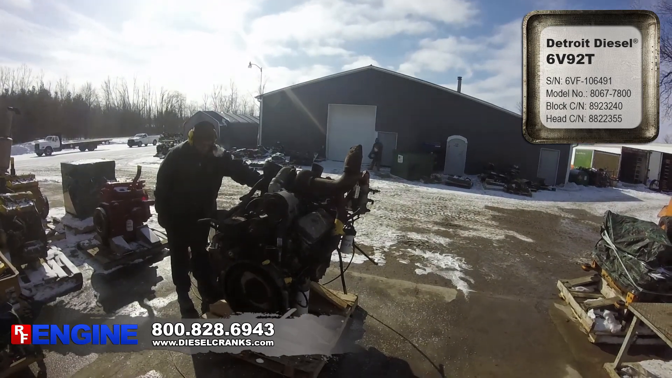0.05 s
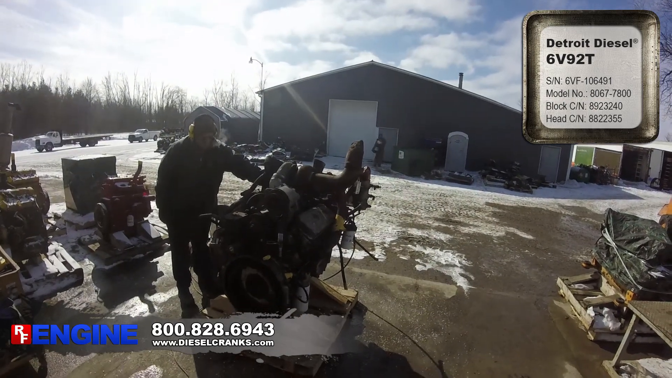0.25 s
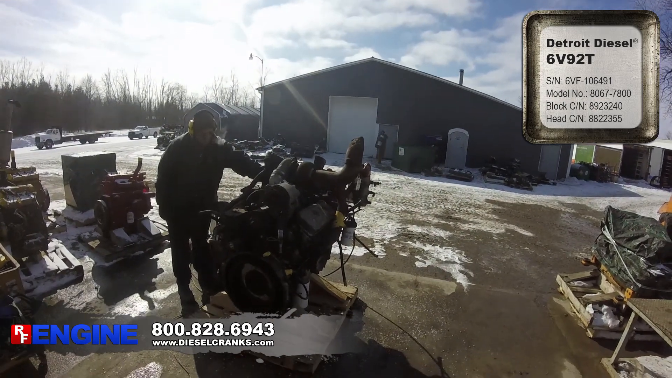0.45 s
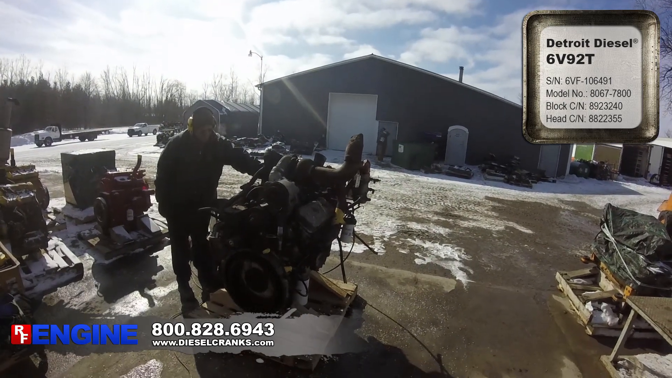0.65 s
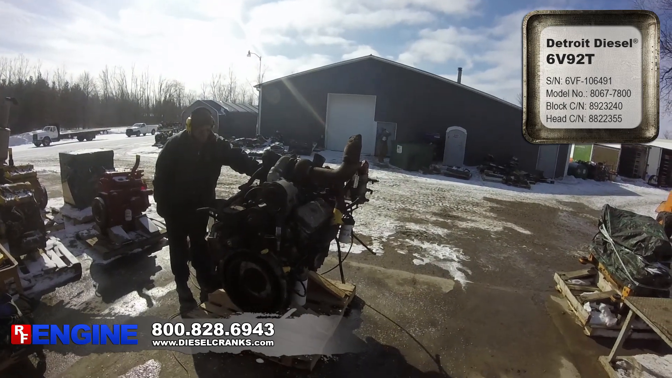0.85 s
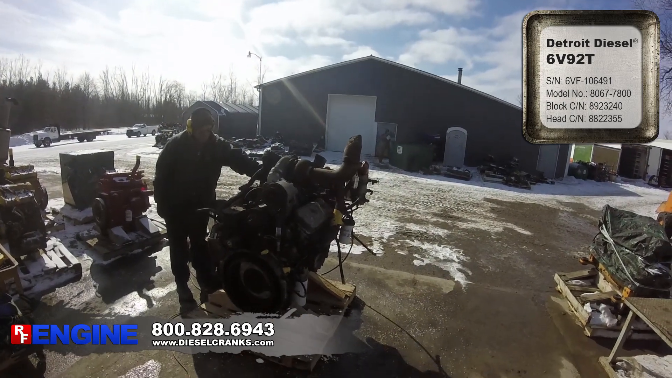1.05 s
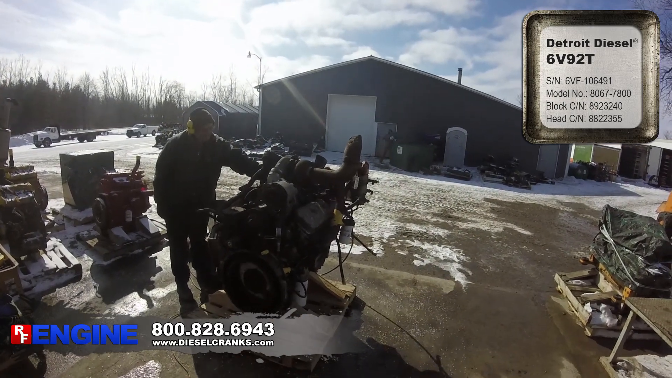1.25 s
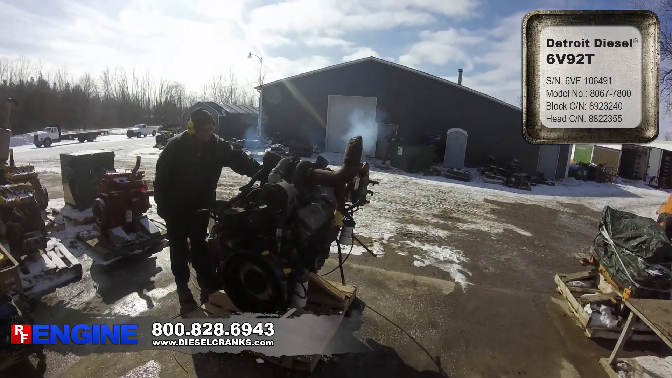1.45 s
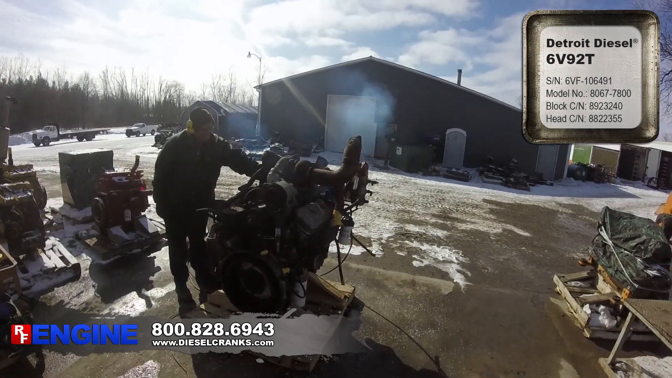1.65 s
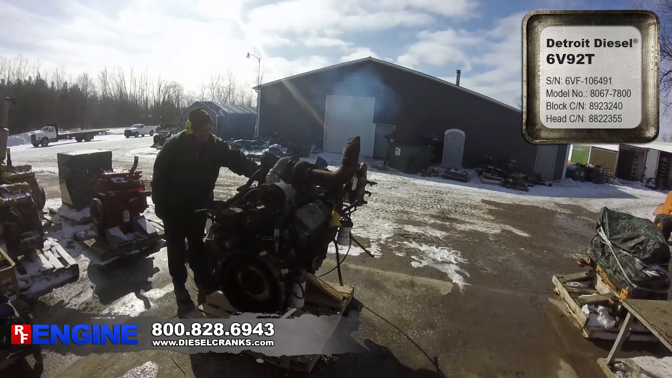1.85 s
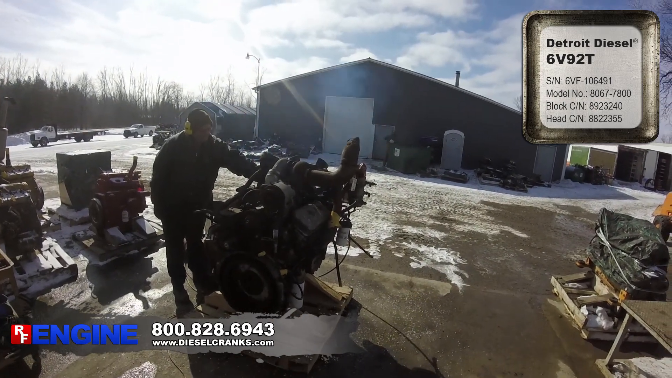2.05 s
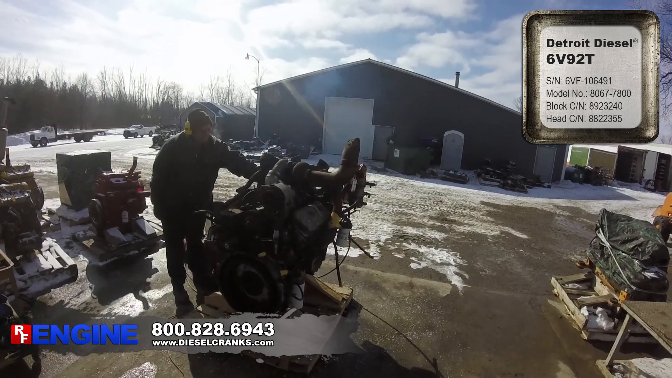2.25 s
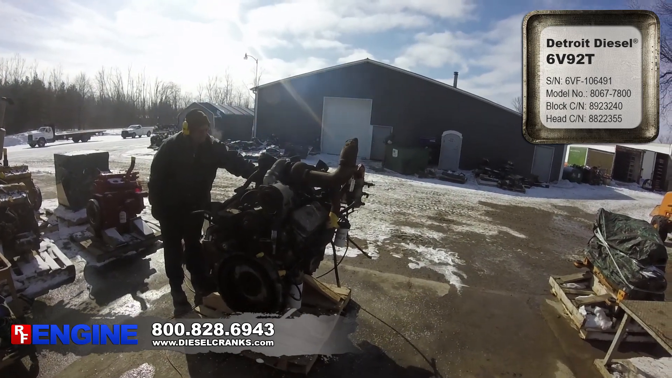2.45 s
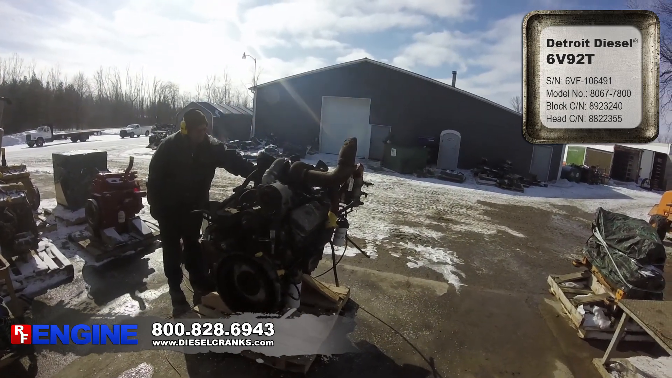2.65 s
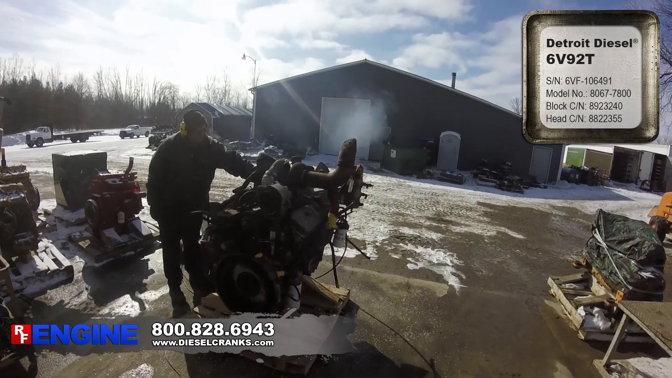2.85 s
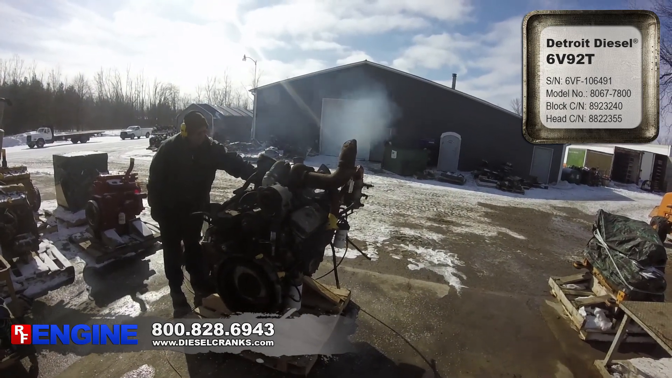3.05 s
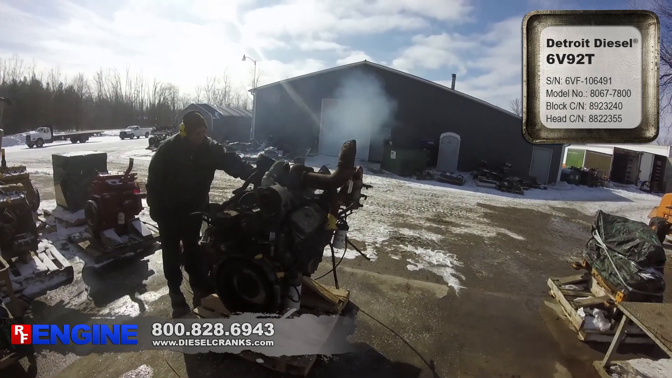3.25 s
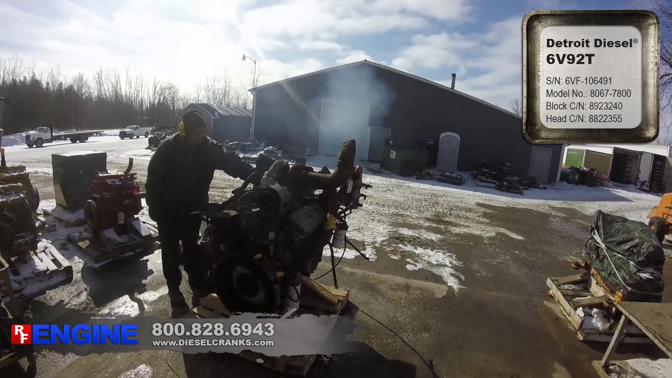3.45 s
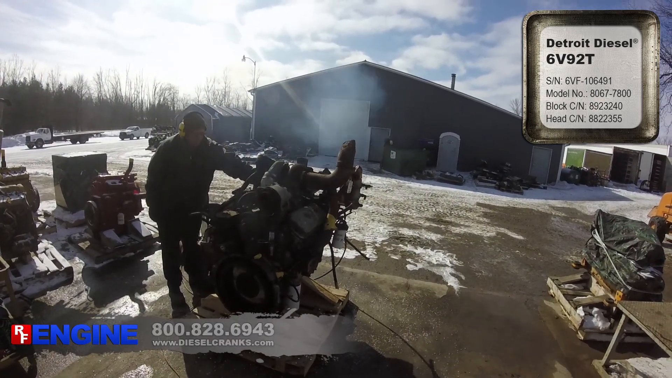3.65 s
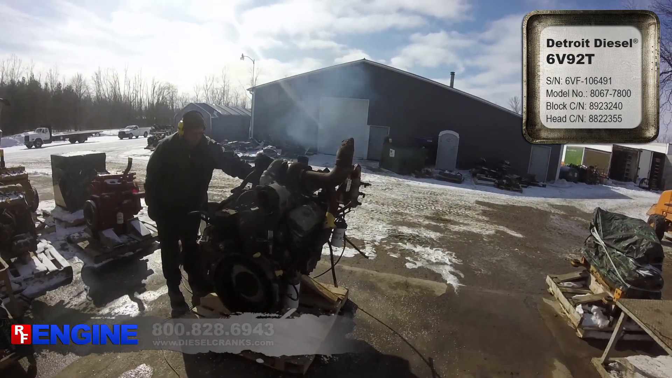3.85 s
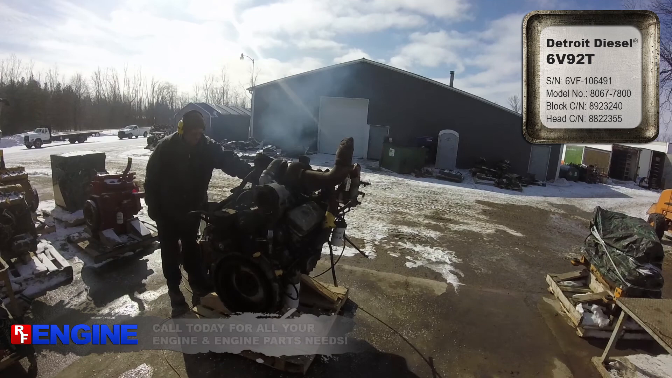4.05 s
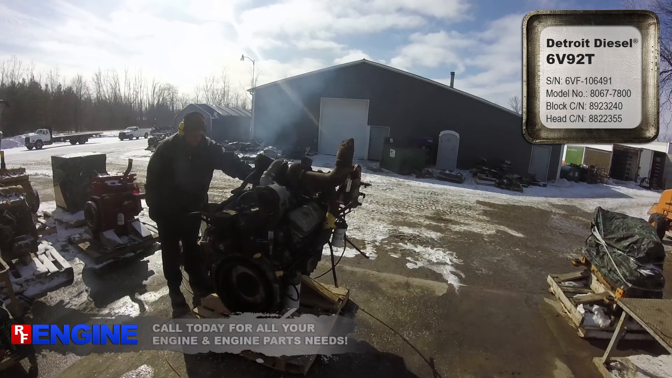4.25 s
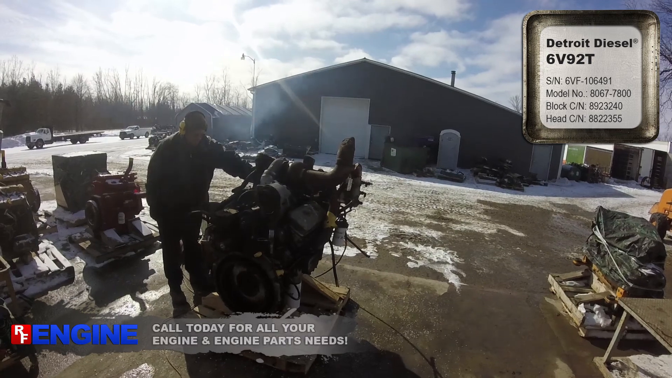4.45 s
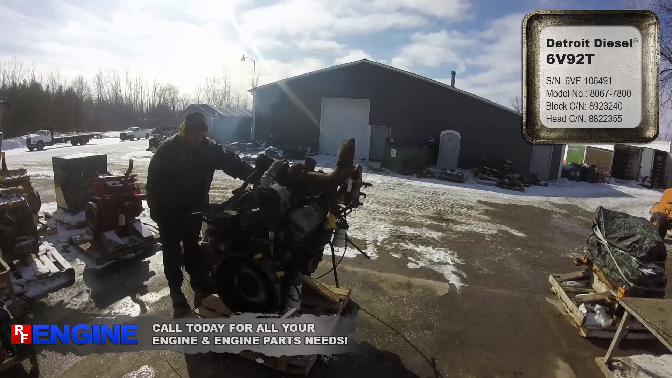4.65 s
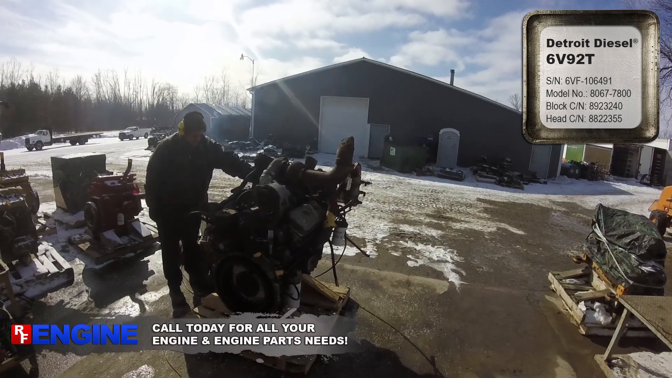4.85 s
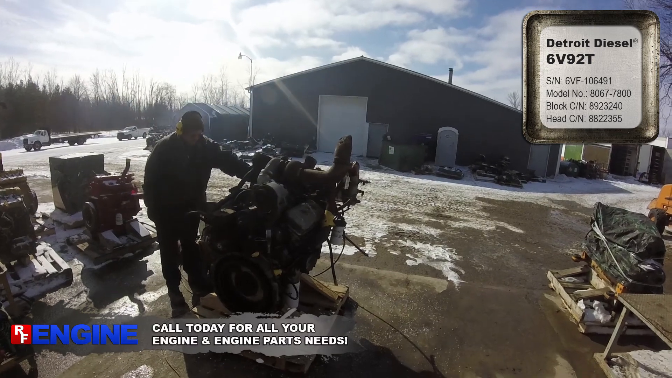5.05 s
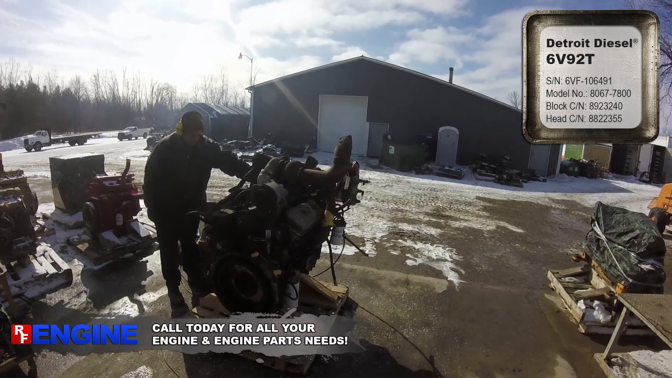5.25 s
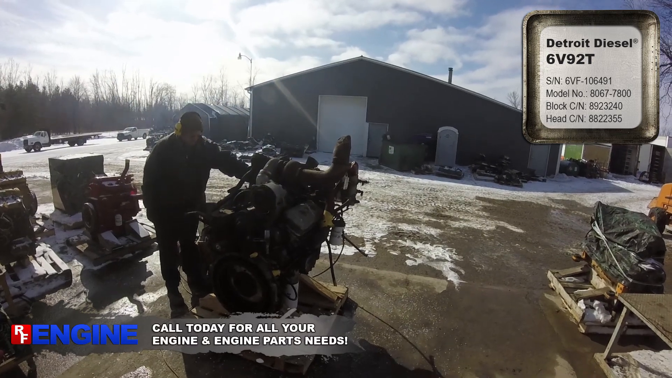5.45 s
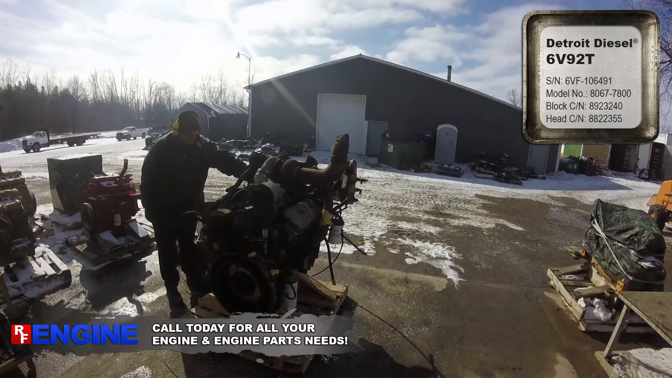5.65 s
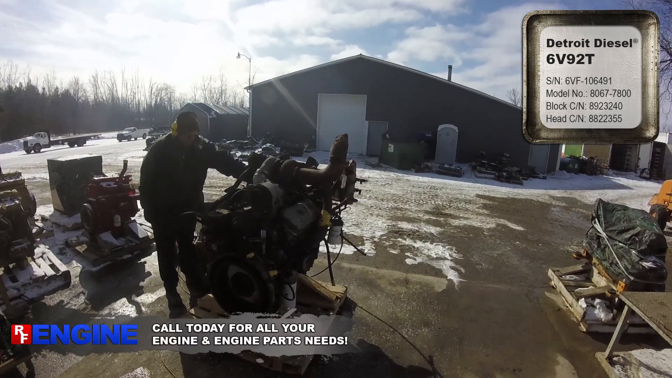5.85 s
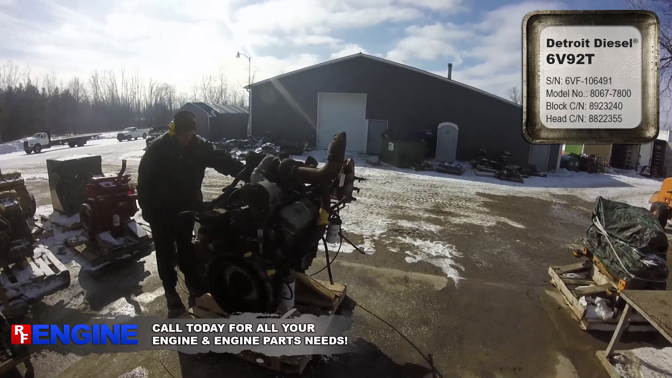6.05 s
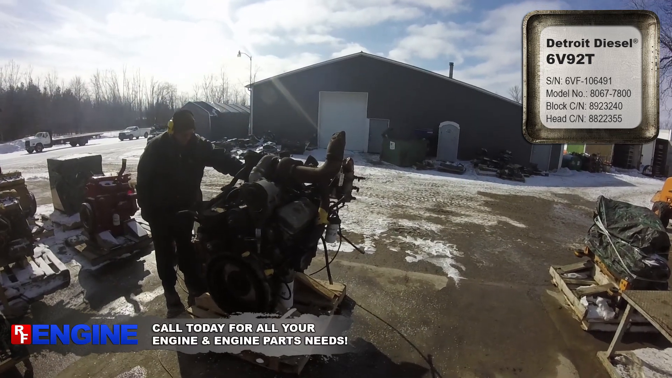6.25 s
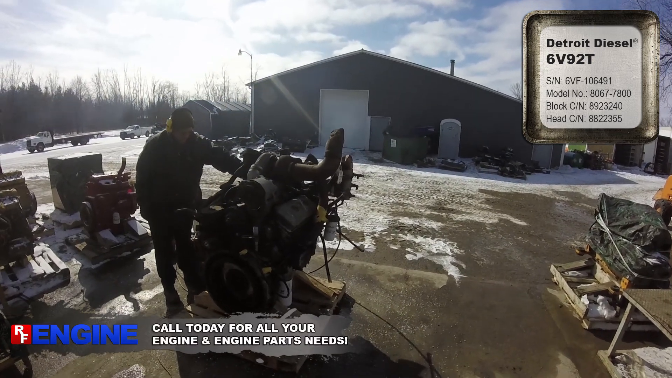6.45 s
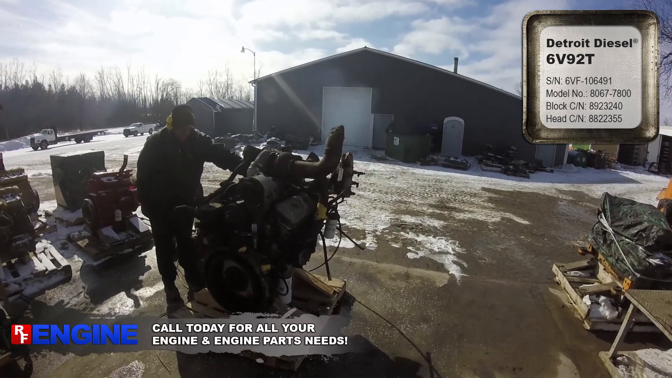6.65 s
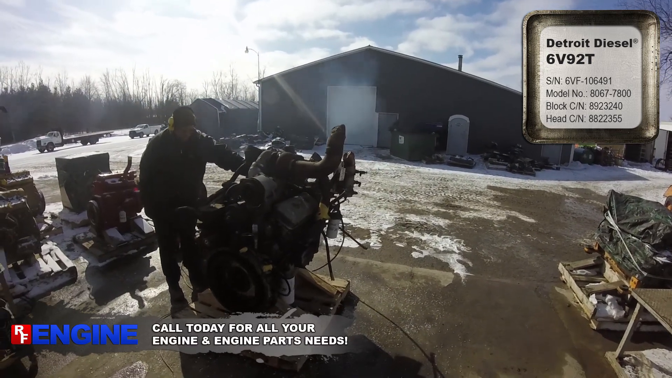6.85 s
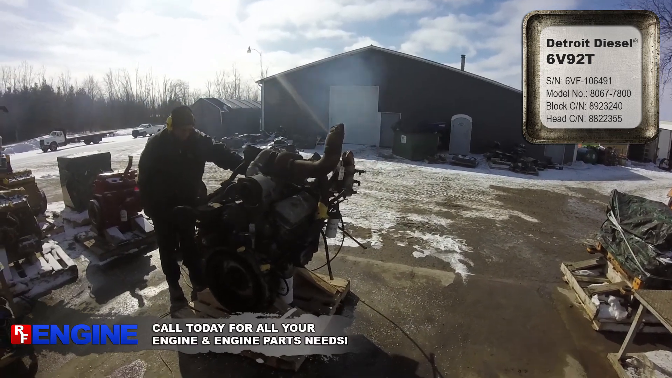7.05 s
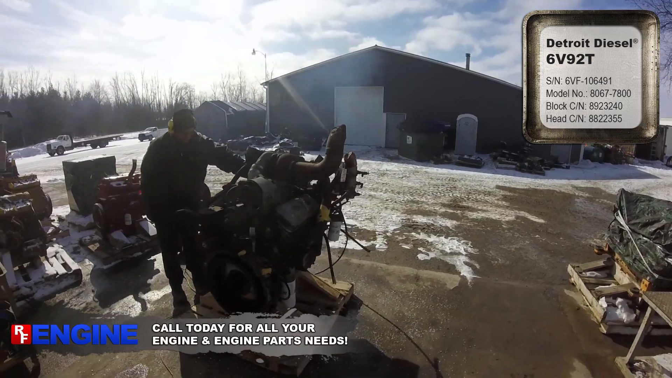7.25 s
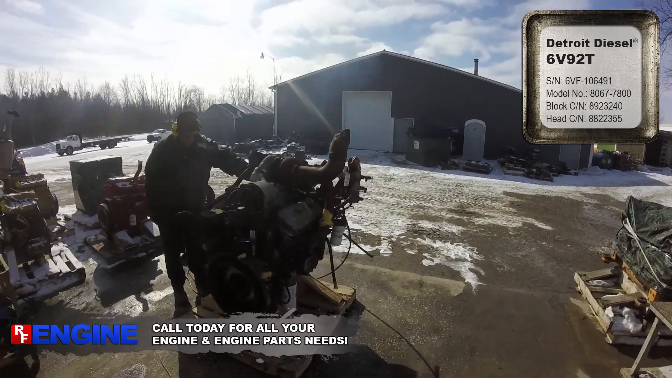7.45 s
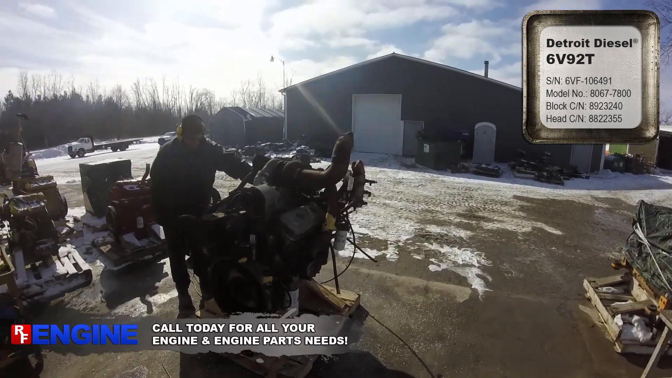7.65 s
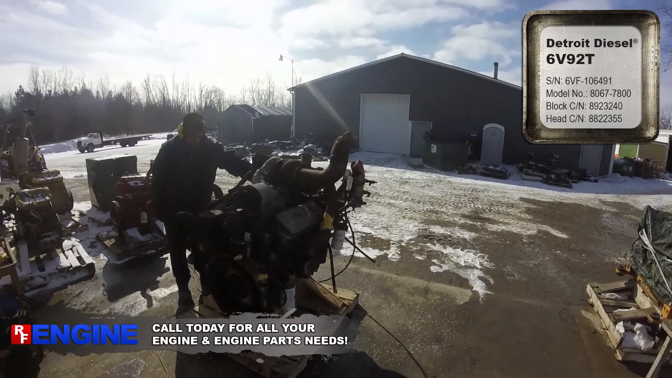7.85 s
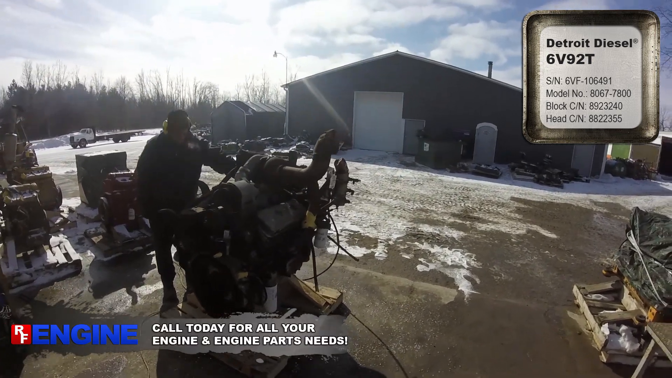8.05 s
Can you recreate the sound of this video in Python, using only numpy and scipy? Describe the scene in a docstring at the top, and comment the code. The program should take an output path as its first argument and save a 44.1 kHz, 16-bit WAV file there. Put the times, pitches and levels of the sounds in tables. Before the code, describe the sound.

A large diesel drones and rattles in an open yard, speeding up, sinking to a slow knocking idle, then roaring back up.

```python
"""A deep, clattering drone: a big two-stroke V6 diesel idles fast on a stand in an open yard.
It revs up, coasts down to a slow idle, then revs again and stays high almost to the end.
Six firings a turn drone from the open exhaust. Injectors and burning fuel knock on the iron block,
the valve parts rattle in step with the crankshaft, and gears whine through the ringing metal.
The yard adds a faint echo to the clatter, and a light breeze rumbles underneath."""
import sys
import numpy as np
from scipy import signal
from scipy.fft import rfft, irfft
from scipy.io import wavfile
from scipy.ndimage import uniform_filter1d

SR = 44100
rng = np.random.default_rng(int(sys.argv[2]) if len(sys.argv) > 2 else 0)


def log_audio(samples):
    """Write samples as a 16-bit WAV file to the path given in sys.argv[1]."""
    # one column per channel
    frames = np.atleast_2d(samples).T
    # limit to full scale, then quantise
    limited = np.clip(frames, -1, 1)
    pcm = np.round(limited * 32767).astype(np.int16)
    wavfile.write(sys.argv[1], SR, pcm)


N = 357198
TIME = np.arange(N) / SR
FREQ = np.arange(N // 2 + 1) * SR / N
SLOW_IDLE_HZ, FAST_IDLE_HZ, HIGH_SPEED_HZ = 11, 20, 30.6  # crankshaft turns per second

# how fast the crankshaft turns: t/s, f/Hz
CRANK_SPEED = [(0, 19.8), (.45, 20), (.92, 22.6), (1.08, 22.2), (1.33, 18), (1.78, 24.4), (1.98, 25.5),
               (2.5, 24.95), (2.7, 30.2), (2.94, 35.5), (3.08, 35.7), (3.3, 31), (3.65, 24.7), (4, 19),
               (4.3, 14.6), (4.64, 9.85), (4.89, 9.4), (5.07, 11.5), (5.3, 9.6), (5.75, 10.8), (6.16, 10.3),
               (6.5, 20.8), (6.8, 29.1), (6.95, 30.8), (7.33, 30.35), (7.87, 31.05), (8.1, 26.6)]
# pushes on the throttle: start/s, opening/s, hold/s, easing/s, share of full fuel/0-1
THROTTLE_PUSHES = [(0.404, 0.29, 0.14, 0.19, 0.34), (1.35, 0.089, 0.32, 0.29, 0.62),
                   (2.42, 0.2, 0.094, 0.72, 0.98), (4.84, 0.047, .11, 0.092, .75),
                   (5.32, 0.19, 0.13, 0.2, 0.18), (6.06, .17, 0.57, 0.2, 0.93), (7.1, 1, .2, .1, 0.4)]
# fuel cuts that let the engine coast: start/s, hold/s, recovery/s, depth/0-1
FUEL_CUTS = [(1.043, 0.25, 0.081, 0.61), (3.055, 1.13, 0.93, 0.8), (5.08, 0.1, .2, 0.46),
             (7.863, 0.19, .1, 0.75)]
# cylinders in firing order, near and far side in turn: crank angle/turns, knock level/dB
CYLINDER_KNOCKS = [(0.069, -17), (.21, -5), (0.402, -19), (.55, -6), (0.728, -25.5), (.88, -5)]
# main exhaust notes: cycles/turn, slow idle/dB, fast idle/dB, high speed/dB,
# boost at full fuel/dB, coasting/dB
EXHAUST_NOTES = [(3, -52, -49, -38, 9.5, -35.5), (6, -48, -28, -27, 10, -40), (9, -36, -35, -36, 7, -43),
                 (12, -39, -45.5, -44, 11, -43.5), (15, -45, -46, -40.5, 10.5, -50)]
# weak notes from unequal cylinders: cycles/turn, fast idle/dB, high speed/dB
WEAK_NOTES = [(4, -64, -39.5), (5, -52, -44), (7, -53, -46), (8, -51.5, -41.5), (10, -43.5, -44),
              (11, -47.5, -42), (13, -51.5, -40.5), (14, -51, -51), (16, -53, -43), (17, -52, -33.5),
              (18, -50, -48), (19, -50.5, -42), (21, -48, -42)]
# how well the exhaust pipe passes a note: f/Hz, level/dB
PIPE_GAIN = [(60, -9.5), (90, -8.5), (115, -9), (152, 0.5), (185, -3), (215, -3), (258, 0), (285, -4.5),
             (320, -4), (365, -2.5), (395, -0.5), (470, -10.5), (560, -18)]
# resonances (pitches it likes to ring at) of the exhaust piping: f/Hz, width/Hz, level/dB
PIPE_RESONANCES = [(92, 37, 0), (157, 21, -2), (268, 29, 4), (338, 33, 1.5), (466, 89, -5.5)]
# resonances of block, covers and fuel lines: f/Hz, width/Hz, level/dB
BLOCK_RESONANCES = [(417, 167, -3.5), (667, 120, -8.5), (761, 123, -8), (929, 126, -7), (1100, 118, -7.5),
                    (1256, 130, -7.5), (1387.5, 91, -1.24), (1687, 97, -5.5), (2100, 460, -4),
                    (2306, 17, -7), (2554, 123, -4), (2825, 260, -2.5), (3080, 79, -1.5), (3433, 287, -4),
                    (3950, 170, -6.5), (4165, 63, -6.5), (4570, 350, -14), (5400, 3500, -19),
                    (6175, 500, -13), (6970, 240, -22), (7500, 290, -19), (8000, 130, -23),
                    (8250, 400, -14.5), (8830, 1200, -21.5), (11570, 1360, -28), (13140, 811, -29.5),
                    (14593, 4290, -38)]
# block resonances that hard firing wakes: f/Hz, width/Hz, level/dB
BARK_RESONANCES = [(760, 155, -6.5), (960, 140, -2), (1113, 170, 0.5)]
# resonances of the oil pan and stand: f/Hz, width/Hz, level/dB
PAN_RESONANCES = [(242, 51, 2.5), (384, 51, 0.5)]
# resonances of the gear case: f/Hz, width/Hz, level/dB
CASE_RESONANCES = [(727, 230, -14.5), (1360, 70, -6), (1670, 115, -3), (2020, 230, -11), (2470, 240, 0),
                   (2800, 120, -16)]
# whining notes of gears and blower: cycles/turn, level/dB
GEAR_NOTES = [(25, -11), (27, -9), (29, -8), (31, -5.5), (33, 1), (38, -1), (41, -5.5), (44, -5.5), (47, 0),
              (57, 0.5), (63, -4.5), (66, -0.5), (70, -9), (81, -4.5), (92, -0.5), (104, -3), (106, -4)]
# each part by name: fast idle level/dB, then change per doubled speed/dB, at full fuel/dB, coasting/dB
PART_LEVELS = {"iron": (-37.5, 6.5, 7.5, -4.5), "bark": (-47, 4.5, 13, -9), "covers": (-37.5, 9, 7.5, -3.5),
               "injectors": (-43.5, 10.5, 10, -3.5), "gears": (-42, 9.5, 1, -6.5),
               "crank gear": (-37.5, 4, -3, 1)}


def exhaust_drone(turn, hz, load, coast, waver_db=1.0, rough_db=2.5):
    """Firings make notes that follow the crank, swell at the pipe's resonances and sink without fuel."""
    speeds = [SLOW_IDLE_HZ, FAST_IDLE_HZ, HIGH_SPEED_HZ]
    notes = []
    for cycles, *speed_db, load_db, coast_db in EXHAUST_NOTES:
        notes.append((cycles, np.interp(hz, speeds, speed_db) + load_db * load, coast_db, waver_db))
    for cycles, fast_db, high_db in WEAK_NOTES:
        firing_db = np.interp(hz, speeds, [fast_db - 4, fast_db, high_db]) + 4 * load
        notes.append((cycles, firing_db, -51, rough_db))
    pipe_hz, pipe_db = np.transpose(PIPE_GAIN)
    drone = 0
    for cycles, firing_db, coast_db, wobble_db in notes:
        db = (1 - coast) * firing_db + coast * coast_db
        db += np.interp(np.log(cycles * hz), np.log(pipe_hz), pipe_db)
        gain = np.sqrt(2) * undb(db + wobble_db * wander(35))
        drone += gain * np.sin(2 * np.pi * (cycles * turn + rng.random()))
    # the pipe's narrow mouth hardly lets the lowest notes out
    return band(drone, 60, 1900)


def exhaust_chuff(turn, hz, load):
    """Puffs of swirling gas boom in the pipe, harder when the engine pulls at speed."""
    sizes = undb(np.array(CYLINDER_KNOCKS)[:, 1] / 4)
    puffs = blows(turn, np.arange(6) / 6, sizes, jitter_s=0.00056, scatter_db=2.0)
    swirl = steady(fade(np.abs(puffs), 0.06) * rng.standard_normal(N))
    boom = ring(steady(puffs) + undb(-0.5) * swirl, resonator(PIPE_RESONANCES))
    db = np.interp(hz, [12, 21], [-44, -49]) + 16 * load * np.minimum(hz / 27, 1)
    return steady(band(boom, 78, 1230, order=3)) * undb(db)


def machinery(turn, hz, load, coast):
    """The heavy block mostly rings with the rattle; thin covers and fuel lines answer the knocks."""
    block = resonator(BLOCK_RESONANCES)
    hits, bursts = knock(turn, load)
    contacts = steady(rattle(turn, hz, load + coast) + undb(-8 + 10 * load) * thud(hits))
    knocks = sizzle(bursts, load, hz, hiss=1.0, loaded_hiss=0.5)
    ticks = sizzle(bursts, load, hz, hiss=0.54, loaded_hiss=0.14)
    # the pan drums as the engine rocks on its stand: at slow idle, pulling or coasting
    rocking = np.clip(.5 * load + coast + np.interp(hz, [11, 19], [1, 0]), 0, 1.3)
    pan = steady(ring(contacts + rocking * knocks, resonator(PAN_RESONANCES)))
    iron = steady(band(ring(contacts + undb(-16 + 5.4 * load) * knocks, block), 531, 1870))
    parts = {
        "iron": iron + pan * undb(-12 + 6 * rocking),
        "bark": steady(ring(knocks, resonator(BARK_RESONANCES))),
        "covers": steady(band(ring(contacts + undb(1) * knocks, block), 2020, 4510, order=6)),
        "injectors": steady(band(ring(ticks + undb(-12) * contacts, block), 5110, 16400, order=6)),
        "gears": gear_whine(turn, block),
        "crank gear": crank_gear(turn),
    }
    mix = 0
    for part, sound in parts.items():
        idle_db, speed_db, load_db, coast_db = PART_LEVELS[part]
        db = idle_db + speed_db * np.log2(hz / FAST_IDLE_HZ) + load_db * load + coast_db * coast
        mix += sound * undb(db)
    return mix


def knock(turn, load, decay_s=0.0032, rise_s=0.004):
    """Each firing is a short burst of force; gives back the hits and the outline of the bursts."""
    angles, db = np.transpose(CYLINDER_KNOCKS)
    hits = blows(turn, angles, undb(db), jitter_s=.00012, scatter_db=2.5)
    # each cylinder's valve levers clack a little later
    clacks = blows(turn, angles + 0.23, undb(db), jitter_s=0.00045, scatter_db=2.5)
    bursts = fade(hits + 0.72 * (1 - load) * clacks, decay_s)
    return hits, steady(smooth(bursts, rise_s))


def sizzle(bursts, load, hz, hiss, loaded_hiss, grit_db=0.87):
    """Gritty metal noise fills each burst: clear when pulling, sunk in hiss at slow idle."""
    between = (1 - load) * (hiss + np.interp(hz, [11, 18], [0.95, 0])) + load * loaded_hiss
    return steady((bursts + between) * undb(grit_db * wander(900)) * rng.standard_normal(N))


def thud(hits, decay_s=0.0075):
    """The blow of a firing spreads through the iron along many paths."""
    t = TIME[:SR // 10]
    paths = rng.standard_normal(len(t)) * np.exp(-t / decay_s)
    return steady(signal.fftconvolve(hits, paths)[:N])


def rattle(turn, hz, slack, count=190):
    """Small taps of gears, cams and pistons repeat every turn, more loosely as slack grows."""
    angles = np.arange(count) / count
    # a random pattern that feeds all multiples of the crank speed alike
    sizes = irfft(np.exp(2j * np.pi * rng.random(count // 2 + 1)), count)
    tight = steady(blows(turn, angles, sizes, jitter_s=.00003, scatter_db=1.2))
    loose = steady(blows(turn, angles, sizes, jitter_s=0.00016, scatter_db=3.0))
    # the nearest piston slaps once a turn, most plainly at slow idle
    slap_db = np.interp(hz, [11, 22], [1.9, 1.1]) * np.cos(2 * np.pi * (turn - .4))
    return steady(((1 - 0.5 * slack) * tight + 0.7 * slack * loose) * undb(slap_db))


def crank_gear(turn, teeth=78, play=.5, flutter_db=2.5):
    """The crank gear's teeth sing through the gear case, jolted by each side's three firings a turn."""
    jolts = .8 * np.sin(2 * np.pi * 3 * turn)
    gain = np.sqrt(2) * undb(flutter_db * wander(60))
    tone = np.sin(2 * np.pi * teeth * turn + jolts + play * wander(110))
    return ring(gain * tone, resonator(CASE_RESONANCES))


def gear_whine(turn, block, play=0.52, flutter_db=3.5):
    """Gear teeth meet with a little play and sing out as their pitch passes a block resonance."""
    tones = 0
    for cycles, db in GEAR_NOTES:
        gain = undb(db + flutter_db * wander(24))
        tones += gain * np.sin(2 * np.pi * cycles * turn + play * wander(90))
    return unit(band(ring(tones, block), 560, 6300))


def yard_echo(x, echo_db=-21, die_away_s=0.46):
    """Parked machines and the shed wall add a faint, short echo."""
    t = TIME[:SR // 2]
    tail = band(rng.standard_normal(len(t)), 300, 3200, order=1)
    tail *= undb(-60 * t / die_away_s) * (t > .008)
    return x + undb(echo_db) * signal.fftconvolve(x, tail / np.sqrt(np.sum(tail ** 2)))[:N]


def breeze(db=-54):
    """Lightly moving air makes a low, wavering rumble."""
    return unit(band(rng.standard_normal(N), 16, 55, order=2)) * undb(db + 1.4 * wander(4.2))


def fuel(shut_s=0.03):
    """How hard the engine pulls (load) and how far its fuel is cut (coast), both 0-1."""
    cuts = sum(depth * swell(start, shut_s, hold, back) for start, hold, back, depth in FUEL_CUTS)
    pushes = sum(share * swell(*timing) for *timing, share in THROTTLE_PUSHES)
    coast = np.clip(cuts, 0, 1)
    return np.clip(pushes, 0, 1) * (1 - coast), coast


def blows(turn, angles, sizes, jitter_s, scatter_db):
    """One blow per turn at each crank angle, never quite the same in time or size."""
    due_turns = (np.arange(int(turn[-1]) + 1)[:, None] + angles).ravel()
    chance = rng.standard_normal((len(due_turns), 2))
    times = np.interp(due_turns, turn, TIME, right=2 * TIME[-1]) + jitter_s * chance[:, 0]
    at = np.round(times * SR).astype(int)
    size = np.resize(sizes, len(due_turns)) * undb(scatter_db * chance[:, 1])
    heard = (at >= 0) & (at < N)
    return np.bincount(at[heard], size[heard], N)


def resonator(modes):
    """How a body with these resonances answers each frequency."""
    power = sum(undb(db) ** 2 / (1 + 2 * ((FREQ - hz) / width) ** 2) ** 2 for hz, width, db in modes)
    # these steps make the body ring after a blow, never before it
    cepstrum = irfft(np.log(power + 1e-9) / 2, N)
    cepstrum[1:N // 2] *= 2
    cepstrum[N // 2 + 1:] = 0
    return np.exp(rfft(cepstrum))


def ring(x, response):
    """Play a force through a body."""
    return irfft(rfft(x) * response, N)


def band(x, lo_hz, hi_hz, order=4):
    """Keep the sound between two frequencies."""
    sos = signal.butter(order, [lo_hz, min(hi_hz, .48 * SR)], "band", fs=SR, output="sos")
    return signal.sosfilt(sos, x)


def fade(x, seconds):
    """Give every blow a dying tail."""
    return signal.lfilter([1], [1, -np.exp(-1 / (seconds * SR))], x)


def swell(start, rise_s, hold_s, fall_s):
    """Rise to 1, hold, fall back to 0."""
    return np.interp(TIME, start + np.cumsum([0, rise_s, hold_s, fall_s]), [0, 1, 1, 0])


def wander(rate):
    """A smooth random wobble of size 1, with `rate` new values a second."""
    size = int(SR / rate)
    steps = np.repeat(rng.standard_normal(N // size + 1), size)[:N]
    return unit(smooth(steps, 1 / rate))


def smooth(x, seconds):
    """Round off quick changes by averaging twice."""
    size = max(int(seconds * SR), 1)
    return uniform_filter1d(uniform_filter1d(x, size), size)


def steady(x):
    """Hold the running level at 1, however fast the blows come."""
    return x / np.sqrt(smooth(x ** 2, .1) + 1e-18)


def unit(x):
    """Scale the overall level (rms) to 1."""
    return x / np.sqrt(np.mean(x ** 2))


def undb(db):
    """Turn decibels into a multiplier."""
    return 10 ** (np.asarray(db) / 20)


def scene():
    """The crank times every engine sound; speed and fuel set how loud each one is."""
    hz = smooth(np.interp(TIME, *np.transpose(CRANK_SPEED)), .05)
    load, coast = fuel()
    turn = np.cumsum(hz * (1 + .0012 * wander(25))) / SR  # crank turns so far
    gas_turn = turn - .0085 * hz  # the gas takes 8.5 ms to reach the pipe's mouth
    exhaust = exhaust_drone(gas_turn, hz, load, coast) + exhaust_chuff(gas_turn, hz, load)
    return (exhaust + yard_echo(machinery(turn, hz, load, coast)) + breeze())[None]


def record(dry, top_hz=15600):
    """Cut away the very highest treble."""
    return signal.sosfilt(signal.ellip(10, .2, 70, top_hz, fs=SR, output="sos"), dry)


dry = scene()
out = record(dry)
log_audio(out)
```